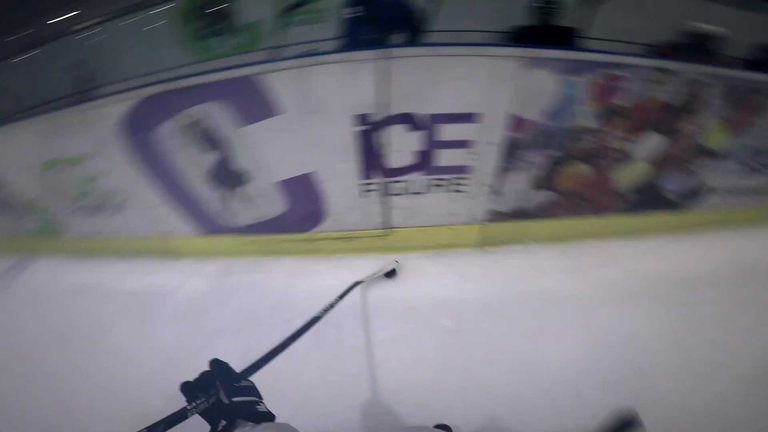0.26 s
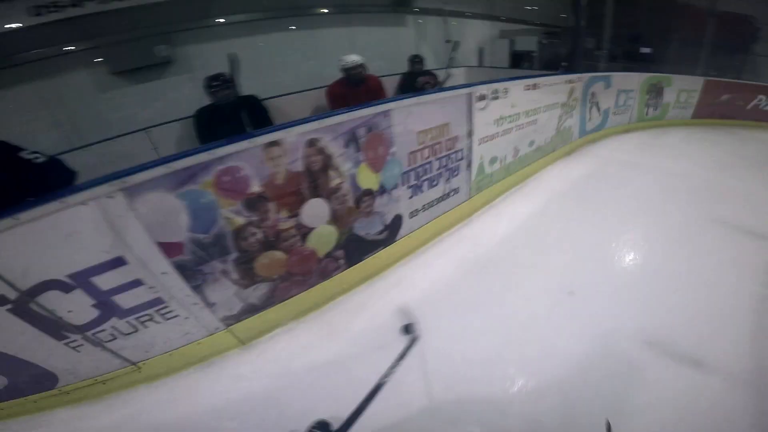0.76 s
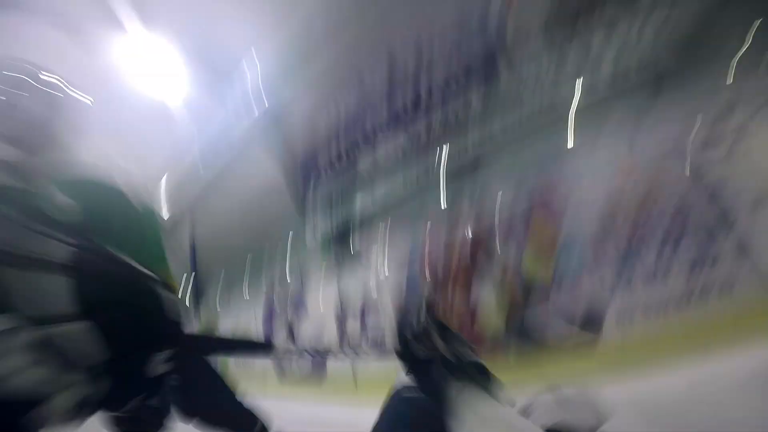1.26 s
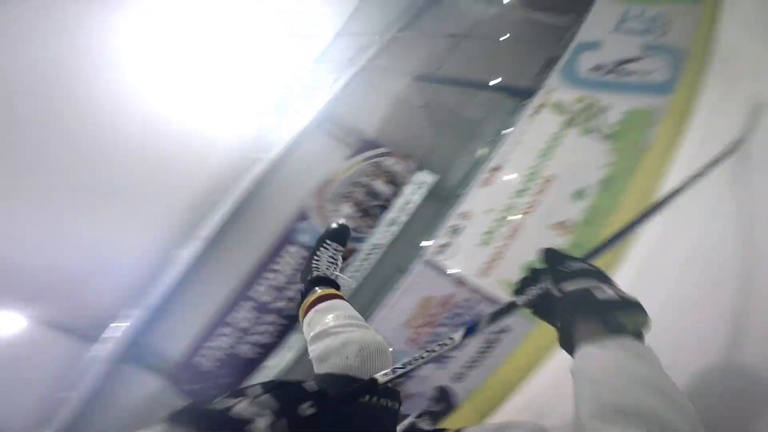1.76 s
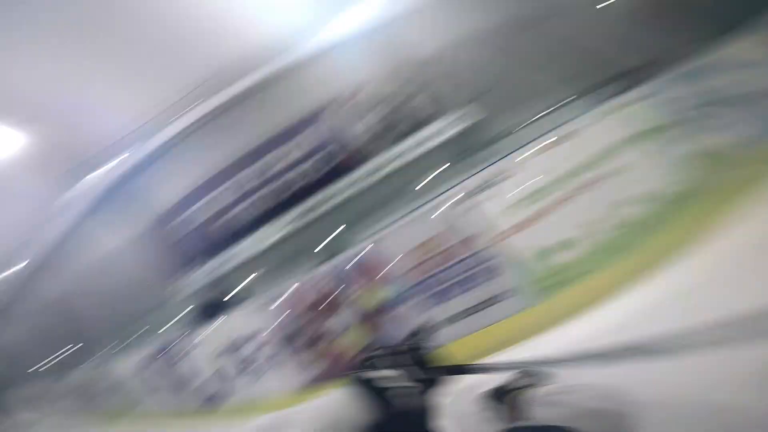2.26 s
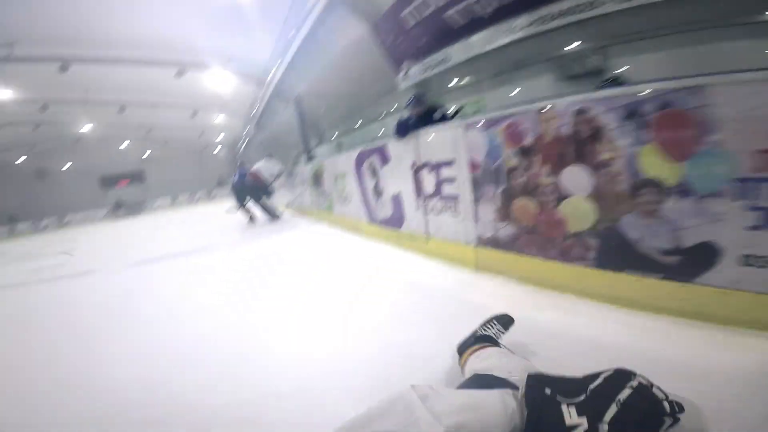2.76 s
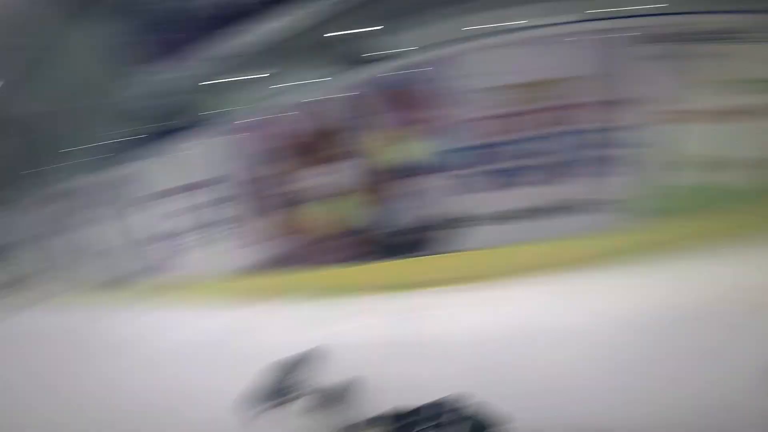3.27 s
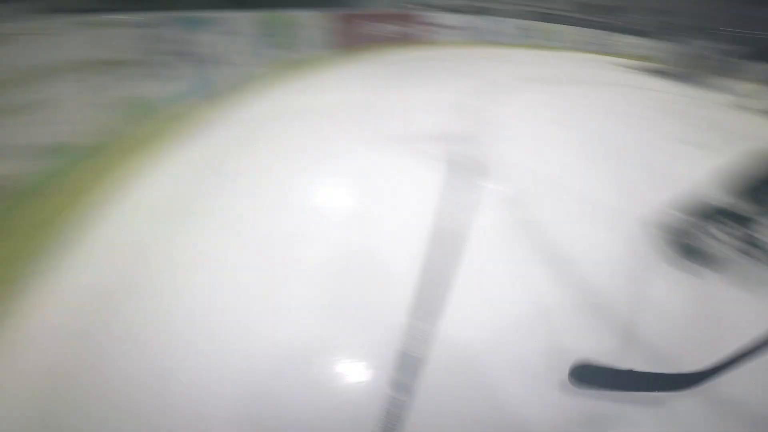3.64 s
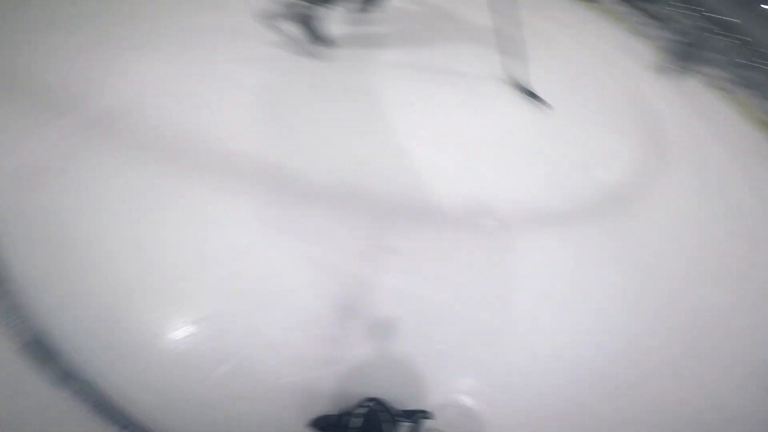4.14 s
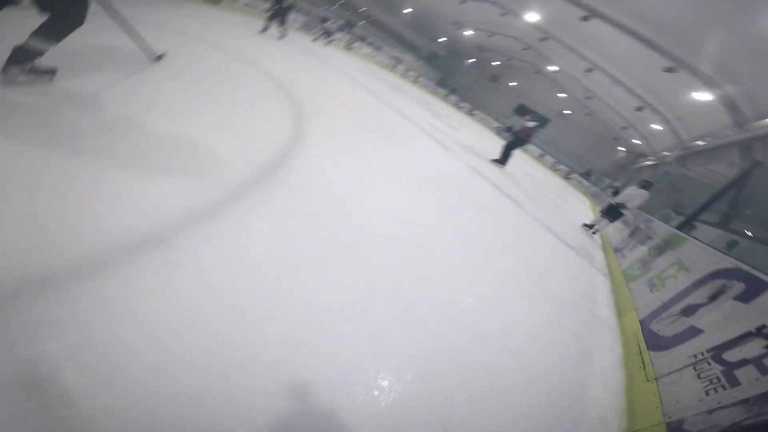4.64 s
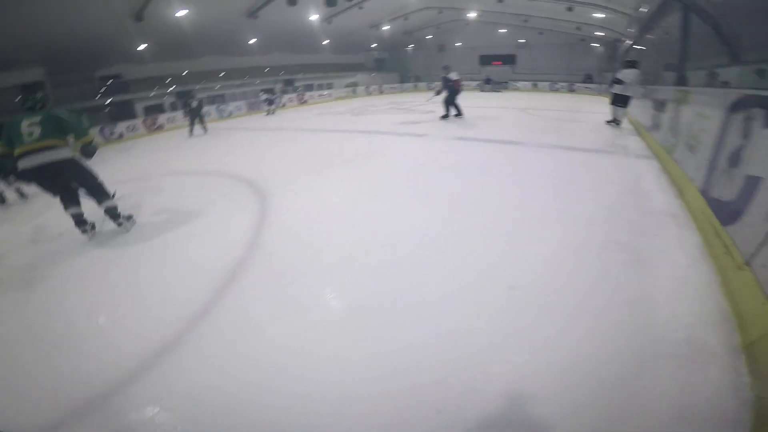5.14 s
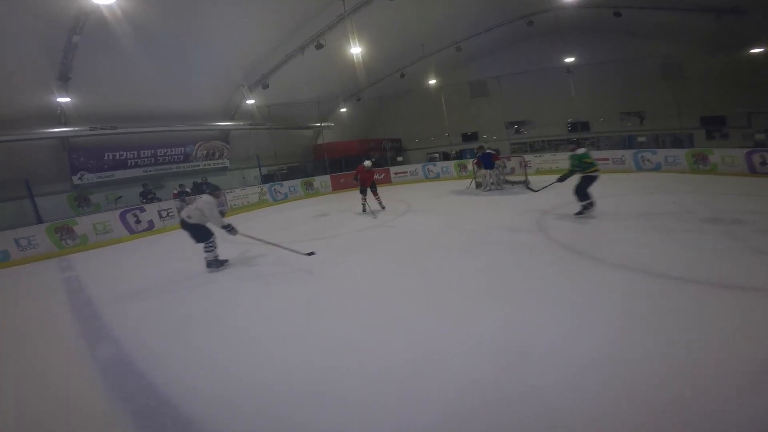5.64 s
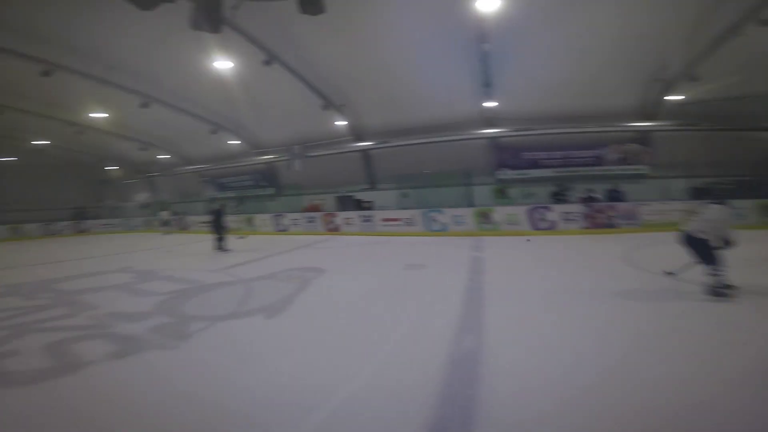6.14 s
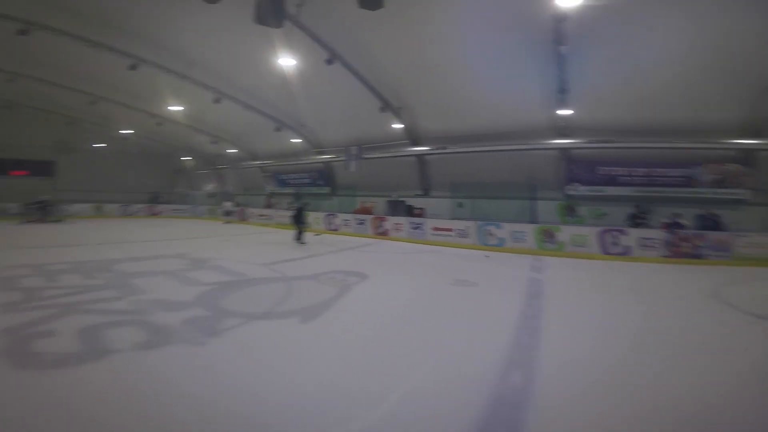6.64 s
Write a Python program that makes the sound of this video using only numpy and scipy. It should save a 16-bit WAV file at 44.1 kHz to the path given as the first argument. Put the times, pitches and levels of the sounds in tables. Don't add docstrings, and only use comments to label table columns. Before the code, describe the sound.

Helmet-level hockey: boxy ice scraping and low wind wobble, a burst of hard clattering knocks, a quieter lull, then a sharp shot booming off the boards.

```python
import sys
import numpy as np
from scipy import signal
from scipy.fft import next_fast_len
from scipy.io import wavfile
from scipy.ndimage import uniform_filter1d, map_coordinates

SR = 44100
rng = np.random.default_rng(int(sys.argv[2]) if len(sys.argv) > 2 else 0)


def rack_gain(trim_db):
    fader = np.asarray(trim_db, float)
    return 10 ** (fader / 20)


def put_to_file(sound):
    columns = np.atleast_2d(sound).T
    safe = np.clip(columns, -1, 1)
    whole_steps = np.round(safe * 32767)
    wavfile.write(sys.argv[1], SR, whole_steps.astype(np.int16))


N = 304147

# (time [s], scrape level [dB], bite over scrape [dB], hall boom over scrape [dB])
SKATING = [(0, -25.5, -5, -37), (.2, -26, -6.5, -13), (.3, -30, -13, -18.5), (.74, -30.5, -10.5, -15),
           (.81, -34, -12.5, -19), (1.25, -31.5, -16, -12), (1.275, -50.5, -10.5, -10), (1.9, -43, -8, -19),
           (2.1, -42, -5.5, -15), (2.19, -35, -9, -13), (2.5, -31, -17, -24), (2.7, -32.5, -14, -9.5),
           (3.27, -31, -13, -17), (3.31, -37, -11, -17), (3.95, -34.5, -11, -11.5),
           (5.42, -37.5, -9.5, -11), (6.27, -33.5, -13, -15.5), (6.9, -33, -19, -8)]
# (pitch [Hz], width [Hz], level [dB])
HOUSING_MODES = [(1000, 375, -11), (1450, 635, -1), (1900, 400, -1.5), (2584, 700, -2), (3057, 380, -10)]
# (pitch [Hz], width [Hz], level [dB])
BITE_MODES = [(3680, 1100, 5.5), (5630, 840, -3), (7300, 260, -19), (7470, 830, -8)]
# (pitch [Hz], width [Hz], level [dB])
SPRAY_MODES = [(8500, 4500, -1), (9600, 1200, -2), (12100, 3600, -9)]
# (pitch [Hz], width [Hz], level [dB])
BOARD_MODES = [(229, 175, 0), (405, 410, 0.5), (666, 1280, 1.5)]
# (time [s], scrape [dB], bite [dB], spray [dB])
EDGE_DIGS = [(.05, -32, -37, -52), (.11, -28, -51, -61), (.5, -46, -40.5, -57), (.57, -48, -52, -50),
             (.66, -45, -58, -76), (1.02, -42, -50, -64), (2.3, -50, -48, -56), (2.7, -30, -58, -70),
             (2.8, -46, -39.5, -71), (2.94, -54, -49, -59), (3.55, -60, -55, -60), (3.76, -64, -51, -68),
             (3.88, -53, -44, -55), (4.66, -50, -40.5, -58), (5.57, -35.5, -39.5, -68),
             (5.67, -33, -33.5, -58), (5.73, -34, -33, -68), (5.86, -36, -49, -75), (6.04, -55, -41.5, -74)]
# (time [s], scrape [dB], bite [dB], spray [dB], boom [dB])
BOARD_SHOTS = [
    (0, -34, -47, -62, -33),
    (4.266, -25.5, -49, -65, -28),
    (4.284, -16.5, -26.5, -42, -28),
    (4.335, -29, -42, -58, -50),
    (6.314, -25, -50, -66, -30),
    (6.33, -25.5, -45, -62, -30.5),
    (6.88, -43, -66, -75, -35),
]
SLAP_T60_SHARES = (0.42, 1.8, 1.3, 0.6)
HALL_T60_SHARES = (1.31, 0.53, 0.083, 0.75)
# (start [s], end [s], pitch
# [Hz], level over scrape [dB])
BLADE_BANDS = [(0.085, 0.26, 1986, 0.5), (0.53, 0.726, 1940, -1.5), (.70, .78, 9900, -30),
               (2.303, 2.52, 2030, -9), (2.64, 3.154, 1900, -2), (2.95, 3.222, 7100, -18),
               (3.298, 3.484, 1610, 3), (3.706, 4.005, 1890, 1), (4.054, 4.2, 1450, -6),
               (4.2, 4.27, 1900, 1), (4.275, 4.41, 1280, -8), (4.335, 4.95, 1900, -13),
               (4.717, 5.2, 1500, -5), (4.903, 5.36, 1960, -5.5), (0, 0.303, 1000, -7.5),
               (.03, 0.213, 6100, -14), (0.985, 1.085, 5950, -13), (5.671, 5.8, 7400, -5),
               (5.673, 6.303, 2900, -4), (5.596, 6.234, 1646, -9.5), (5.8, 6.3, 5830, -25),
               (6.74, 6.918, 1555, -1),
               (.46, .5, 10500, -26), (0, .22, 5000, -14), (0, .22, 7500, -16), (1.86, 2.2, 7800, -20),
                 (2.33, 2.46, 11400, -30), (5.8, 6.1, 7700, -24), (2.2, 2.295, 6800, -19),
                 (2.33, 2.46, 9900, -23), (2.34, 2.46, 6960, -22), (2.82, 2.95, 7300, -28),
                 (3.05, 3.16, 8600, -28), (3.5, 3.68, 7700, -20), (3.68, 3.78, 6300, -17),
                 (3.838, 4.03, 9600, -23), (3.88, 3.976, 4630, -9), (3.86, 4.2, 6100, -18),
                 (4.45, 4.803, 4600, -16), (5.68, 5.8, 10300, -28), (4.493, 4.72, 1535, -8),
                 (4.5, 4.7, 2100, -9)]

# (time [s], peak [dB], ring pitch [Hz], ring time [s])
STICK_TAPS = [(0.469, -15, 1720, 0.053), (0.534, -4.5, 1900, 0.022), (0.547, -13.5, 1370, 0.02),
              (0.686, -9, 2020, 0.019), (0.703, -7.5, 1840, 0.018), (1.022, -3.5, 2120, 0.035),
              (1.169, -9.5, 1900, 0.017), (1.178, -10, 1900, 0.016), (1.198, -1.5, 1900, 0.018),
              (1.2015, -8.5, 1090, 0.023), (1.215, -18, 2000, 0.024), (1.2435, -3.5, 1360, 0.0072),
              (1.495, -26, 2040, 0.036), (1.588, -23, 1450, 0.018), (1.681, -1.5, 1950, 0.016),
              (6.3315, -12, 3850, 0.019), (6.332, -9, 2560, 0.019), (6.339, -14, 1670, 0.016),
              (6.404, -19, 2600, 0.026), (6.411, -19, 2080, 0.028), (1.835, -31, 2700, 0.02),
              (2.4546, -16.5, 1920, 0.027), (3.115, -16, 2160, 0.021), (5.763, -14, 2780, 0.019)]
# (time [s], peak [dB], ring pitch [Hz], crack [dB])
GEAR_SNAPS = [(0.764, -10.5, 1670, -10.5), (0.989, -26, 2060, -7), (1.07, -10, 1850, -16),
              (1.1542, -7.5, 2500, -11.5), (1.158, -21, 2520, -4), (1.21, -15, 1860, -21),
              (1.2533, 3, 2450, -17), (1.514, -21.5, 1160, -26), (1.53, -15.5, 1800, -15),
              (1.747, -25, 2070, -8), (1.874, -28.5, 1380, -12), (2.17, -14.5, 2030, -19),
              (2.336, -12, 1900, -9), (2.599, -14.5, 1780, -15), (3.343, -21.5, 3300, -16),
              (4.144, -22, 1250, -27), (4.287, -11, 2800, -19), (4.299, -16, 1320, -12),
              (5.555, -20.5, 2640, -11.5), (.375, -34, 2500, 0), (.518, -20, 2600, -16),
              (5.595, -21, 1690, -9), (5.618, -38, 2000, -12), (4.985, -26, 2000, -12)]
# (time [s], peak [dB], ring pitch [Hz], body [dB])
PADDED_KNOCKS = [(0.747, -25, 1740, -0.5), (0.777, -17, 1780, -10.5), (0.96, -23, 1310, -1.5),
                 (1.22, -17.5, 1350, -12), (1.605, -22.5, 2640, -29), (1.621, -24.5, 1300, -12),
                 (1.733, -36, 1450, -2), (1.887, -20, 1450, -14.5), (2.067, -31, 2040, -9),
                 (2.11, -15.5, 2180, -24), (2.122, -22.5, 2100, -16), (3.285, -15.5, 1450, -18.5),
                 (3.6375, -16, 1510, -44), (4.267, -16, 1340, -13), (6.315, -10.5, 1450, -27)]
# (time [s], peak [dB], ring pitch [Hz], ring time [s])
SHELL_THUDS = [(0.752, -18, 245, 0.046), (0.957, -21.5, 259, 0.13), (1.024, -22, 175, 0.028),
               (1.193, -18.5, 245, 0.029), (1.25, -21.5, 163, 0.063), (1.491, -54, 194, 0.07),
               (1.577, -24.5, 185, 0.14), (1.681, -18, 165, 0.05), (1.738, -20, 169, 0.056),
               (1.857, -43, 172, 0.07), (1.885, -27, 168, 0.043), (2.071, -45, 211, 0.07),
               (2.113, -23, 263, 0.093), (2.468, -36.5, 228, 0.082), (2.597, -27, 270, 0.017),
               (3.283, -27.5, 262, 0.036), (3.742, -34.5, 243, 0.17), (6.316, -25, 340, 0.07),
               (6.362, -30, 393, 0.088), (6.547, -28, 240, 0.099)]
# (time [s], peak [dB], ring pitch [Hz],
# ring time [s])
SMALL_PINGS = [(1.1542, -22, 6180, 0.0073), (1.159, -19, 2560, 0.01), (1.1655, -22, 2600, .012),
               (1.171, -7.5, 1660, 0.0068), (1.1715, -20, 2680, 0.011), (1.1815, -26, 1810, .012),
               (1.1985, -7, 1540, 0.011), (1.211, -22, 2700, .012), (1.2115, -30, 4900, 0.022),
               (1.2225, -28, 2650, .012), (1.235, -24, 1520, 0.011), (1.2535, 0, 1750, 0.013),
               (1.2538, 0, 2320, 0.0082), (1.254, -24, 3900, 0.016), (1.2537, -15, 6920, 0.0076),
               (1.26, -26, 2220, .015), (1.501, -31, 2500, .012), (1.51, -31, 2800, .012),
               (1.5095, -34, 4960, .005), (1.527, -39, 5350, 0.0072), (1.528, -41, 2880, .015),
               (1.533, -37, 4230, 0.026), (1.607, -50, 6000, 0.028), (1.682, -14, 1410, 0.023),
               (1.682, -22, 4400, 0.013), (1.6825, -31, 6029, .008), (1.694, -29, 1480, 0.018),
               (1.756, -40, 5500, .008), (1.759, -40, 2900, .015), (2.308, -41, 5500, .02),
               (2.308, -37, 6900, .02), (2.3365, -14, 1700, 0.036), (2.337, -18.5, 2580, 0.027),
               (2.338, -28, 4160, .015), (2.362, -36, 7800, 0.018), (2.363, -20, 1980, 0.029),
               (2.374, -20, 1900, .02), (2.394, -20, 2100, .02), (2.601, -19, 2690, 0.048),
               (3.2853, -7.5, 1610, .02), (3.2855, -17, 3280, 0.023), (3.287, -25, 4400, .018),
               (3.638, -14.5, 1854, 0.07), (4.287, -23, 5540, .02), (4.318, -13, 1250, 0.022),
               (4.34, -18, 1760, 0.036), (6.3155, -28, 2900, .02), (6.316, -23, 3752, 0.028),
               (6.316, -33, 4900, .02), (6.3165, -37, 7300, .015),
               (.686, -32, 5500, .008), (.699, -27, 4300, .01), (.764, -22, 4720, 0.018),
               (0.766, -34, 7800, .012), (0.778, -17, 1500, 0.007), (.989, -35, 7400, .008),
               (1.071, -21, 4100, .012), (1.1543, -31, 9700, .004), (1.2538, -25, 10240, .004),
               (1.2538, -31, 13000, .004), (1.289, -33, 1350, .012), (1.346, -40, 895, .012),
               (1.53, -41, 7800, .006), (1.622, -25, 1000, .01), (1.681, -38, 9000, .004),
               (1.747, -41, 7200, .008), (1.8605, -33, 2120, .015), (1.874, -28, 2650, .012),
               (1.8868, -22, 1000, 0.011), (2.336, -35, 9500, .006), (2.796, -32, 4200, .012),
               (2.822, -32, 3920, .012), (3.194, -32, 3890, .012), (3.458, -36, 3780, 0.013),
               (3.88, -31, 4200, .015), (4.298, -32, 7900, .015), (4.298, -35, 10200, .012),
               (5.577, -26, 2720, .012), (5.578, -39, 7400, .01), (5.589, -28, 3200, .01),
               (5.592, -32, 5200, .01), (5.62, -32, 4500, .012), (5.682, -27, 2890, .015),
               (5.743, -22, 2700, .01), (5.743, -24, 1700, .01), (6.339, -37, 8800, .015),
               (6.323, -24, 1500, .015), (6.3355, -22, 1100, .015), (6.345, -20, 2300, .012),
               (6.352, -26, 1500, .015), (5.555, -23, 2830, .012), (4.144, -32, 1300, .03),
               (6.411, -44, 6800, .012), (.99, -40, 11500, .004), (1.159, -38, 11000, .004),
               (1.529, -44, 10500, .004), (1.682, -14, 2900, .012)]

# (time [s], wobble level [dB])
OWN_WIND = [(0, -5.5), (.21, -7.5), (.26, -22), (.31, -9.5), (.72, -11), (.9, -17), (1.28, -9), (1.38, -56),
            (1.5, -21), (2.58, -24), (3.5, -26.5), (3.7, -20), (5.35, -19), (5.5, -12), (5.9, -17),
            (6.27, -22.5), (6.38, -28.5), (6.9, -17)]
# (start [s], length [s], wobble level [dB])
HEAD_GUSTS = [(2.76, 0.19, -13.5), (3.037, 0.089, -18), (3.498, 0.1, -17), (3.667, 0.052, -11.5),
              (4.585, 0.063, -16), (4.702, 0.2, -14.5), (5.439, 0.17, -18), (5.693, 0.079, -7),
              (5.82, 0.13, -12.5), (5.971, 0.24, -7.5), (6.332, 0.14, -14.5), (6.465, 0.12, -15)]
# (time [s], wobble [dB], mount [dB], strap [dB])
HEAD_JOLTS = [(0.379, -11.5, -41, -44), (0.455, -5, -39, -39), (0.558, -11.5, -44, -25.5),
              (0.672, -5, -38, -51), (0.741, -2, -15.5, -29), (0.957, -20, -18, -40),
              (1.021, -4.5, -12, -37), (1.058, -5, -17, -45), (1.15, -7.5, -17, -41),
              (1.188, -12, -29, -23), (1.245, -12.5, -27, -36), (1.488, -4.5, -26, -24.5),
              (1.57, -16, -23, -24), (1.678, -25, -22, -32), (1.746, -15.5, -44, -50),
              (1.855, -10, -21, -23), (2.01, -18, -45, -40), (2.075, -11.5, -25.5, -28),
              (2.118, -11.5, -33, -34), (2.279, -9, -28.5, -29), (2.384, -9.5, -39, -40),
              (2.448, -10.5, -24, -30.5), (3.061, -31, -36, -38), (3.171, -19.5, -30, -30.5),
              (3.275, -6, -33, -29), (4.221, -16, -44, -46), (4.27, -33, -44, -44), (5.487, -10, -40, -45),
              (5.332, -21, -53, -58), (5.57, -21, -35, -58), (5.706, -15, -22.5, -48),
              (6.308, -19.5, -53, -36), (6.701, -27, -43, -53), (6.851, -19.5, -28, -46)]
# (pitch [Hz], width [Hz], level [dB])
SWING_MODES = [(23.4, 28, -4.5), (35.56, 14.3, -2)]
# (pitch [Hz], width [Hz], level [dB])
MOUNT_MODES = [(72.8, 28, 12), (85, 73, -13), (160, 17, -8)]

# (time [s], level [dB])
WHINE_LEVEL = [
    (0, -69),
    (1.3, -76),
    (1.4, -91),
    (2.0, -86.5),
    (2.6, -75),
    (3.25, -66),
    (3.33, -78),
    (3.45, -69),
    (6.9, -74),
]


def blades():
    level_db, edge_db, boom_db = curves(SKATING)
    bite_db = level_db + edge_db
    spray_under_bite_db = -15.5
    steady = rack_gain([level_db, bite_db, bite_db + spray_under_bite_db, level_db + boom_db])

    dig_rise_s, dig_t60_s = .028, 1.25
    jolt_boom_db = -15.5
    digs = swells(EDGE_DIGS, dig_rise_s, *[dig_t60_s] * 3)
    digs = digs + [rack_gain(jolt_boom_db) ** 2 * jolts()[1]]

    shot_rise_s, slap_t60_s, hall_t60_s, hall_db = 0.0061, 0.24, 3.45, -8.5
    slap = np.array(swells(BOARD_SHOTS, shot_rise_s, *slap_t60_s * np.array(SLAP_T60_SHARES)))
    hall = np.array(swells(BOARD_SHOTS, shot_rise_s, *hall_t60_s * np.array(HALL_T60_SHARES)))
    gain = np.sqrt(np.abs(steady ** 2 + digs + slap + rack_gain(hall_db) ** 2 * hall))

    ice = chips(700., 1.0)
    chatter_db = 0.79 * walk(40)
    scrape = gain[0] * (ringing(ice, HOUSING_MODES, 0.86, 14, wet=2.1) + singing())
    bite = gain[1] * ringing(ice, BITE_MODES, 1.8, 6, wet=1.5)
    spray = gain[2] * ringing(ice, SPRAY_MODES, 2.4, 7, wet=1.9)
    boom = gain[3] * ringing(0, BOARD_MODES, 0.97, 15, wet=1)

    stroke_end_s, stroke_db = .22, -50
    lift = 1 / (1 + np.exp((np.arange(N) / SR - stroke_end_s) / .012))
    stroke = rack_gain(stroke_db) * lift * ringing(ice, [(13200, 3500, 0)], 1.4, 10, wet=1.6)
    return rack_gain(chatter_db) * (scrape + bite + spray) + boom + stroke


def chips(per_s, spread_db):
    torn = rng.random(N) < per_s / SR
    size = torn * rack_gain(spread_db * np.minimum(rng.exponential(size=N), 4.5))
    smear = rng.standard_normal(256) * np.exp(-np.arange(256) / (0.0005 * SR))
    return unit(signal.fftconvolve(size, smear)[:N])


def singing():
    out, t, rub = np.zeros(N), np.arange(N) / SR, rng.standard_normal(N)
    width_share = 0.086
    for start, end, hz, db in BLADE_BANDS:
        span = slice(max(int(start * SR), 0), int(end * SR))
        held = np.abs(np.sin(np.pi * (t[span] - start) / (end - start))) ** 0.23
        out[span] += rack_gain(db - 2.5) * held * unit(steep(rub[span], hz, width_share * hz))
    wander_s, wander_per_s = 0.001104, 6.
    k = int(SR / wander_per_s)
    sway = unit(uniform_filter1d(uniform_filter1d(rub, k), k))
    return map_coordinates(out, [(t + wander_s * sway) * SR], mode="mirror")


def clicks():
    hits = blows(STICK_TAPS, tap) + blows(GEAR_SNAPS, snap) + blows(PADDED_KNOCKS, knock)
    return hits + blows(SHELL_THUDS, thud) + blows(SMALL_PINGS, ping)


def tap(noise, t, hz, t60):
    return click(noise, t, hz, crack_db=-27.5, body_db=-29, t60=t60)


def snap(noise, t, hz, crack_db):
    return click(noise, t, hz, crack_db, body_db=-28.5, t60=0.019)


def knock(noise, t, hz, body_db):
    return click(noise, t, hz, crack_db=-19.5, body_db=body_db, t60=0.029)


def click(noise, t, hz, crack_db, body_db, t60):
    fade = np.log(1000) / max(t60, .004)
    decay = np.exp(-fade * t) + 0.016 * np.exp(-.25 * fade * t)
    rattle = noise * decay * np.minimum(t / 0.00068, 1)
    rattle = rattle + 4.15 * (t == t[3])
    shell = sum(rack_gain(db) * steep(rattle, f, 0.59 * w) for f, w, db in HOUSING_MODES)
    muffle = signal.butter(3, 1.97 * hz, fs=SR, output="sos")
    own_ring = steep(rattle, hz, np.clip(12.0 / t60, 180., 900.))
    ring = signal.sosfilt(muffle, own_ring + 0.62 * shell)

    burst = noise * np.exp(-1.6 * fade * t)
    wall = signal.butter(2, 7500, fs=SR)
    crack = signal.lfilter(*wall, steep(burst, 4800.0, 2500.0) + 1.4 * steep(burst, 4700.0, 4300.0))
    body = steep(noise * np.exp(-.7 * fade * t), 770.0, 600.0)
    return peak(ring, -2.46) + peak(crack, crack_db + 3.0) + peak(body, body_db + 11.0)


def thud(noise, t, hz, t60):
    push = noise * np.exp(-t / 0.0076)
    return peak(band(steep(push, hz, 213.0), hz, 3.1 / max(t60, .02)), -0.56)


def ping(noise, t, hz, t60):
    rise_s, roughness = 0.00027, 0.67
    push = (1 + roughness * noise) * np.cos(2 * np.pi * hz * t) * t * np.exp(-t / rise_s)
    return peak(band(push, hz, 3.5 / max(t60, .004)), 0)


def rocking():
    t = np.arange(N) / SR
    wind = rack_gain(curves(OWN_WIND)[0]) ** 2
    for start, length, db in HEAD_GUSTS:
        wind = wind + (rack_gain(db) * np.sin(np.pi * np.clip((t - start) / length, 0, 1))) ** 2
    wind_share = rack_gain([[0], [-30], [-39.5]])
    jolt_share = rack_gain([[-7], [0], [0]])
    power = wind * wind_share ** 2 + jolts() * jolt_share ** 2
    level, buffet, shake = np.sqrt(np.abs(power))

    swing = ringing(0, SWING_MODES, 0, 3, wet=1)
    reach = uniform_filter1d(np.abs(signal.hilbert(swing, next_fast_len(N))[:N]), 900)
    even_swing = unit(swing / (reach + 0.052) ** 0.97)
    inertia = signal.butter(4, 50., fs=SR, output="sos")
    wobble = signal.sosfiltfilt(inertia, level * even_swing)
    strap = ringing(0, [(116.5, 20, 0)], 2.8, 3.34, wet=1)
    travel = 1.0
    stopped = travel * np.tanh((wobble + kicks()) / travel)
    return stopped + buffet * ringing(0, MOUNT_MODES, 3.3, 12, wet=1) + shake * strap


def kicks():
    swing_hz, swing_width_hz, kick_db = 35, 6.4, 2.5
    s, db = np.transpose(HEAD_JOLTS)[:2]
    push, one_tick = np.zeros(N), np.arange(SR) == 0
    push[(s * SR).astype(int)] = rack_gain(db) * rng.choice([-1, 1], len(s))
    padding = signal.butter(3, 69.4, fs=SR, output="sos")

    def ring(x):
        soft = signal.sosfilt(padding, x)
        return band(band(soft, swing_hz, swing_width_hz), swing_hz, 41.0)

    return rack_gain(kick_db) * ring(push) / np.abs(ring(one_tick)).max()


def jolts():
    rise_s, wobble_t60_s, mount_t60_s, strap_t60_s = 0.015, 0.43, 0.13, 0.39
    return np.array(swells(HEAD_JOLTS, rise_s, wobble_t60_s, mount_t60_s, strap_t60_s))


def electronics():
    whine_hz = 15081 + 4. * walk(3)
    whine = np.sqrt(2) * np.sin(2 * np.pi * np.cumsum(whine_hz) / SR)
    hiss_over_whine_db = 13 + 2.1 * walk(13)
    hiss = rack_gain(hiss_over_whine_db) * steep(rng.standard_normal(N), 16200.0, 6000.)
    level_db = curves(WHINE_LEVEL)[0]
    return rack_gain(level_db) * whine + rack_gain(np.maximum(level_db, -80)) * hiss


def ringing(dry, modes, flicker_db, rate, wet):
    out = 0
    for hz, width, db in modes:
        flicker = rack_gain(db + flicker_db * walk(rate))
        blurred = dry + wet * rng.standard_normal(N)
        out = out + flicker * unit(steep(blurred, hz, width))
    return unit(out)


def swells(table, rise_s, *t60_s):
    s, *columns = np.transpose(table)
    power = np.zeros((len(columns), N))
    power[:, np.clip(s * SR, 0, N - 1).astype(int)] = rack_gain(columns) ** 2
    rise = np.exp(-1 / (rise_s * SR))
    out = []
    for p, t60 in zip(power, t60_s):
        fall = np.exp(-2 * np.log(1000) / (t60 * SR))
        out.append(signal.lfilter([1 - rise], np.convolve([1, -rise], [1, -fall]), p))
    return out


def blows(table, voice):
    size = 6144
    out, t = np.zeros(N + size), np.arange(size) / SR
    for (s, peak_db, *shape), noise in zip(table, rng.standard_normal((len(table), size))):
        i = int(s * SR)
        out[i:i + size] += rack_gain(peak_db) * voice(noise, t, *shape)
    return out[:N]


def curves(table):
    s, *columns = np.transpose(table)
    return [np.interp(np.arange(N) / SR, s, c) for c in columns]


def walk(rate):
    k = int(SR / rate)
    held = np.repeat(rng.standard_normal(N // k + 1), k)
    return unit(uniform_filter1d(uniform_filter1d(held, k), k)[:N])


def band(x, hz, width):
    return signal.lfilter(*signal.iirpeak(hz, hz / width, fs=SR), x)


def steep(x, hz, width):
    return band(band(x, hz, 1.3 * width), hz, 1.3 * width)


def unit(x):
    return x / np.sqrt(np.mean(x ** 2))


def peak(x, db):
    return rack_gain(db) * x / np.abs(x).max()


def scene():
    return (blades() + rocking() + clicks() + electronics())[None]


def band_limit(x):
    return signal.sosfilt(signal.butter(12, 16530, fs=SR, output="sos"), x)


def record(dry):
    cut = signal.ellip(14, .3, 58, 15230, fs=SR, output="sos")
    mix = np.clip(signal.sosfilt(cut, dry), -.99, .99)
    return band_limit(mix)


dry = scene()
out = record(dry)
put_to_file(out)
```